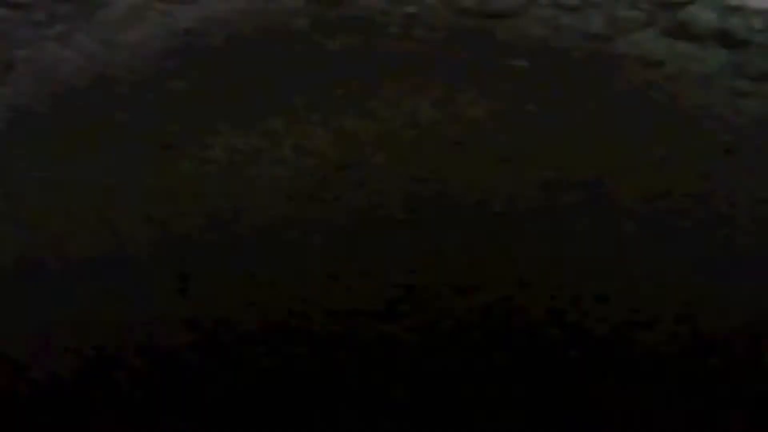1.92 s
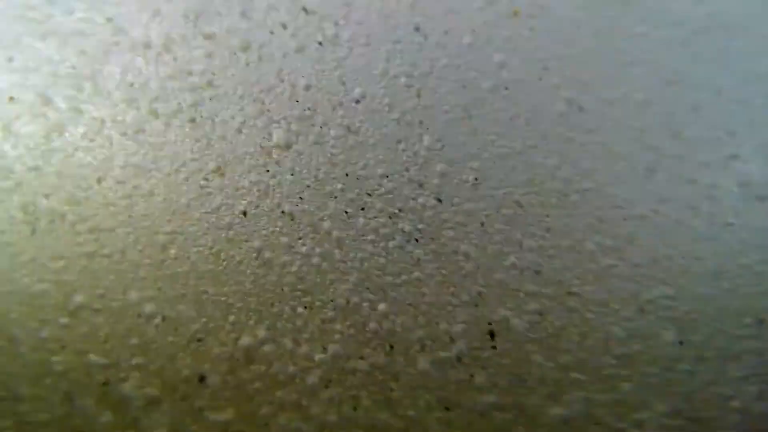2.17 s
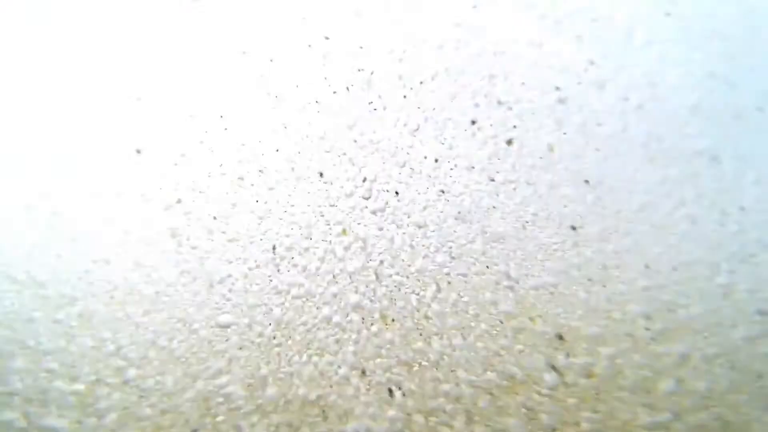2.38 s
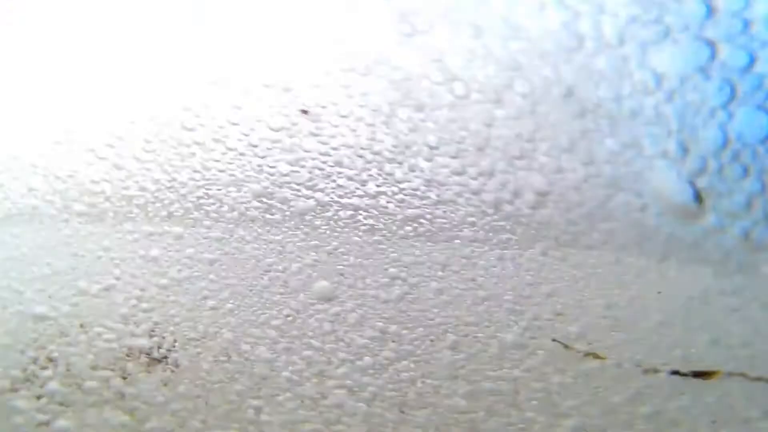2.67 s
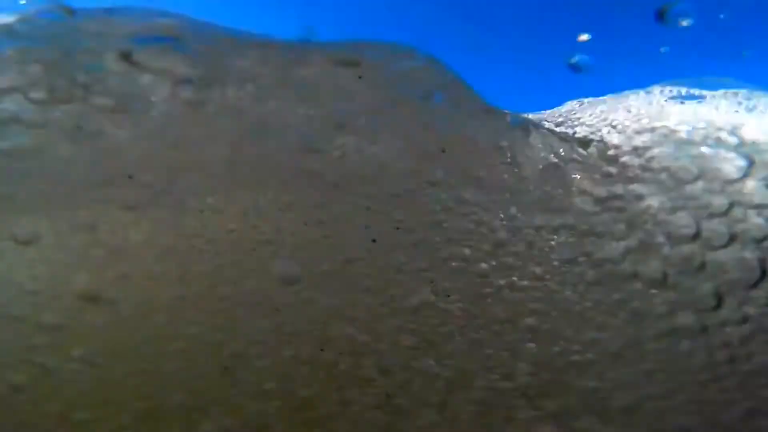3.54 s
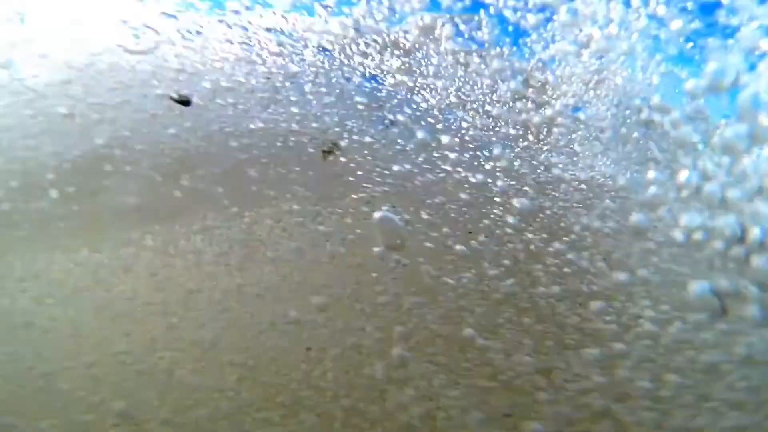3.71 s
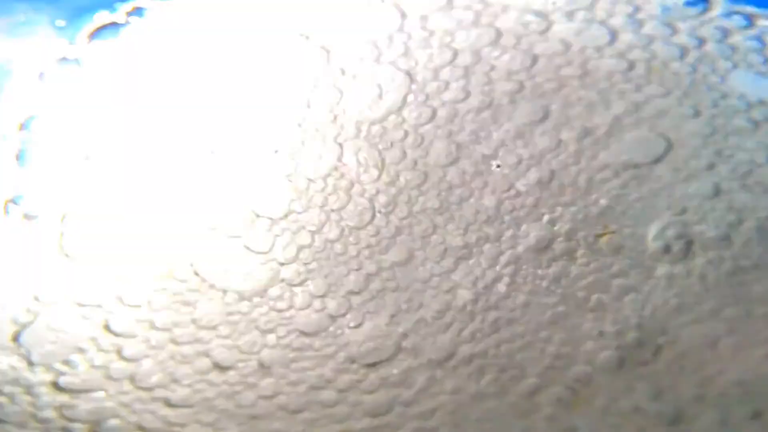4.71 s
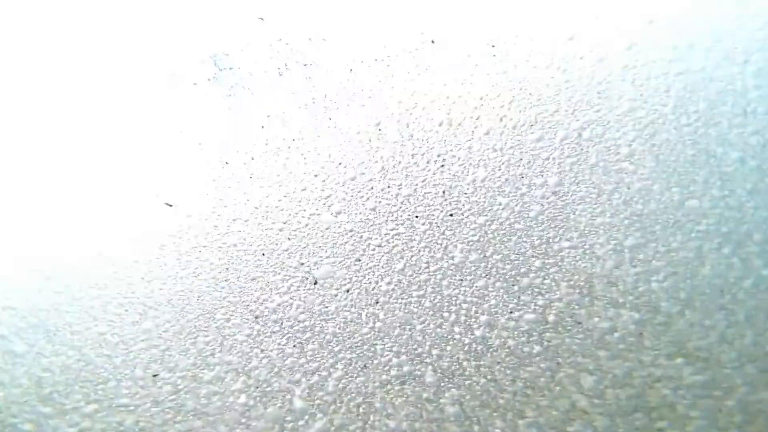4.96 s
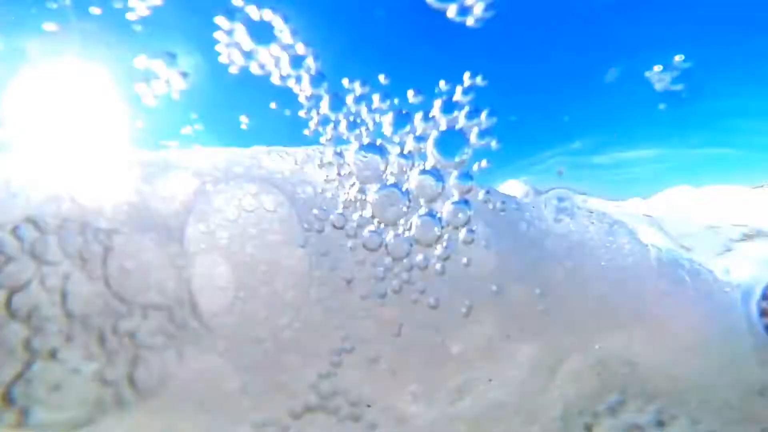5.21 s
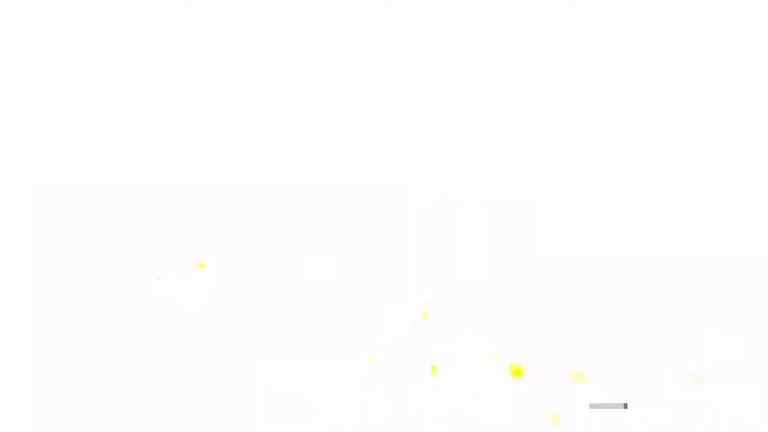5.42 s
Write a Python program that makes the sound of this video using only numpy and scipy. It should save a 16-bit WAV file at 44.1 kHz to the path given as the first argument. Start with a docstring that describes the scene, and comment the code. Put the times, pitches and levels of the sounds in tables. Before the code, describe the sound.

Close, muffled sea foam hisses while bubbles burst sharply on the casing, surging in uneven splashes before cutting off abruptly.

```python
"""A fizzing wash of surf foam, with bubbles bursting against the shell; later spray spatters and a pocket glugs.
The place is the foam itself: two microphones sit in a small camera's sealed housing, water near or further off.
Crowds of damped sines make the bubbles, noise the hiss, rumble and spray, brief rattles the slaps of water.
The shell rings in two ways, pushing both microphones together or in opposition, each with its own colour."""
import sys
import numpy as np
from scipy import signal
from scipy.fft import rfft, irfft, next_fast_len
from scipy.io import wavfile
from scipy.ndimage import map_coordinates

SR = 44100
rng = np.random.default_rng(int(sys.argv[2]) if len(sys.argv) > 2 else 0)


def transcribe(u):
    """Save the signal u as a 16-bit wav file named by the first command-line argument.

    u: samples, shape (n,) or (channels, n), limited to [-1, 1]; the rate is SR.
    q: integer samples, one column per channel.
    """
    v = np.clip(np.atleast_2d(u).T, -1, 1)
    q = np.round(v * 32767).astype(np.int16)
    wavfile.write(sys.argv[1], SR, q)


def volts_from_decibels(level):
    """Turn decibel levels (scalar or array-like) into linear amplitude factors."""
    exponent = np.asarray(level, float) / 20
    return 10 ** exponent


N = 247753  # samples
END_S = 5.497  # the sound stops here


def columns(rows):
    """One value per sample for each column after the time."""
    s, *cols = np.transpose(rows)
    return [np.interp(np.arange(N) / SR, s, col) for col in cols]


def unit(x):
    """x at rms 1, summed over both ways of ringing."""
    return x / np.sqrt(np.sum(np.mean(x ** 2, axis=-1)) + 1e-20)


def wobble(rate):
    """A smooth random curve, rate knots a second (60 at most)."""
    knots = rng.standard_normal(int(N / SR * 60) + 4)
    return map_coordinates(knots, [np.arange(N) * min(rate, 60) / SR])


# the shell's colour when both microphones move together: f/Hz, level/dB
SHELL_TOGETHER = [(15, -33.5), (25, 3), (108, -17.5), (241, -15), (383, -12), (710, -1.5), (1000, -8.5),
                  (1160, -3), (1660, 4), (2400, -9), (3590, -17.5), (4410, -37.5), (5150, -30.5),
                  (6170, -38), (8620, -35), (10500, -47), (11700, -56), (15300, -99)]
# the shell's colour when the microphones move in opposition: f/Hz, level/dB
SHELL_OPPOSED = [(15, -65.5), (25, -22.5), (212, -32.5), (403, -16.5), (828, -6.5), (1280, 10.5),
                 (1940, -11.5), (2850, -7.5), (3590, -19), (4450, -34.5), (5300, -31), (8620, -30.5),
                 (10300, -38.5), (11700, -55.5), (15300, -81.5)]


def shell(x, lo_hz, hi_hz):
    """One range of pitch through the shell's two colours, with nothing ringing ahead of its cause."""
    m = 2 * next_fast_len(N // 2 + 4096)
    hz = np.fft.rfftfreq(m, 1 / SR) + 1
    band = 1 / np.sqrt((1 + (lo_hz / hz) ** 10) * (1 + (hz / hi_hz) ** 10))
    tables = np.transpose(SHELL_TOGETHER), np.transpose(SHELL_OPPOSED)
    colour = volts_from_decibels([np.interp(np.log(hz), np.log(f), db) for f, db in tables])
    # folding the cepstrum onto positive times gives the minimum-phase filter
    cepstrum = irfft(np.log(band * colour + 1e-9), m)
    cepstrum[:, 1:m // 2] *= 2
    cepstrum[:, m // 2 + 1:] = 0
    response = np.exp(rfft(cepstrum))
    return irfft(rfft(x, m) * response, m)[:, :N]


def rings(s, hz, life, size, phase, rise, span):
    """Damped sines with a soft start whose pitch rises as the bubble nears the surface."""
    t = np.arange(span) / SR
    u = t / life[:, None]
    turn = 2 * np.pi * hz[:, None] * t * (1 + rise * np.minimum(u, 4) / 2)
    envelope = (u * np.exp(1 - u)) ** 2
    wave = size[:, None] * envelope * np.sin(turn + phase[:, None])
    start = np.round(np.maximum(s, 0) * SR).astype(int)
    at = start[:, None] + np.arange(span)
    return np.bincount(at.ravel(), wave.ravel(), N + span)[:N]


def froth(near_db, slop, lo_hz, hi_hz, cycles, spread_db, hiss_db, slop_db, lumpy_db, count, size):
    """A crowd of unseen bubbles of uneven strength, over the hiss of water further off."""
    s, pitch, odds, life, *ways = rng.random((count, 8)).T
    hz = lo_hz * (hi_hz / lo_hz) ** pitch
    life_s = cycles * (.5 + life) / hz
    strength = volts_from_decibels(spread_db * np.minimum(-np.log(odds + 1e-9), 2.8))
    # each bubble pushes the two ways with its own strength and phase
    pair = [rings(s * N / SR, hz, life_s, strength * volts_from_decibels(6.6 * share), 2 * np.pi * phase, 0.079, size)
            for share, phase in (ways[:2], ways[2:])]
    # close water: single bubbles stand out of the hiss and the slops cut deeper
    near, far = volts_from_decibels(near_db), volts_from_decibels(hiss_db)
    bubbles = np.array([unit(way) for way in pair])
    water = near * bubbles + far * rng.standard_normal((2, N))
    heard = shell(water / np.hypot(near, far), lo_hz, hi_hz)
    # each slop of water stirs all sizes at once, and each size also clumps by itself
    stir_db = np.sqrt(near) * (slop_db * slop + lumpy_db * wobble(25.063))
    return unit(heard * volts_from_decibels(stir_db))


# the wash, by bubble size: t/s, then small bubbles, large bubbles, air pockets, each level/dB
WASH_LEVELS = [(0, -28, -39.5, -41), (.15, -36, -43.5, -56), (.4, -43.5, -50.5, -61),
               (.56, -43.5, -47.5, -60), (.72, -42.5, -36, -52), (.85, -39.5, -42, -57.5),
               (1.0, -32.5, -31.5, -51.5), (1.3, -37.5, -41, -54.5), (1.6, -46, -51, -59),
               (1.82, -43, -41.5, -52.5), (2.0, -28, -44, -37.5), (2.058, -32.5, -46, -39.5),
               (2.1, -24.5, -32.5, -44.5), (2.165, -35, -48, -43), (2.215, -27.5, -31, -47),
               (2.265, -46.5, -43.5, -53), (2.35, -41.5, -51, -57), (2.7, -41.5, -46.5, -55),
               (2.8, -31.5, -45, -54), (3.05, -39.5, -55, -55.5), (3.3, -38.5, -52, -56.5),
               (3.46, -37.5, -45, -57), (3.54, -29, -36.5, -50), (3.6, -27.5, -36, -40.5),
               (3.675, -37, -42, -51.5), (3.73, -28, -40, -51.5), (3.78, -31.5, -39.5, -48),
               (3.92, -41.5, -53.5, -58), (4.02, -35, -45.5, -51.5), (4.07, -48, -39, -49),
               (4.13, -37, -52, -60.5), (4.2, -30, -43, -54), (4.3, -38.5, -49, -63),
               (4.4, -39.5, -50.5, -65.5), (4.52, -32.5, -41, -53.5), (4.68, -35, -32.5, -54.5),
               (4.82, -29, -35.5, -50.5), (4.95, -26.5, -29.5, -34), (5.04, -31.5, -39.5, -44.5),
               (5.09, -29, -41, -41), (5.17, -33, -33.5, -42), (5.25, -37, -45.5, -50.5),
               (5.45, -39, -49.5, -57.5)]
# how close the churning is to the shell: t/s, level/dB of single bubbles before each size sets its hiss
CHURN_NEARNESS = [(0, -13), (.7, -5), (1.2, -6.5), (1.8, -6), (2.1, -2.5), (2.4, 8), (3, -9.5), (3.3, -7.5),
                  (3.7, -6), (4.2, 3), (4.6, -4), (5, -7.5), (5.5, 0.5)]
# level of the top bands over the small bubbles: t/s, then 2.3-4.2 kHz, above 4.2 kHz, each level/dB
TOP_BANDS = [(0, 2, -9), (.3, -13.5, -10.5), (.55, -6, -13), (1.3, -8, -15), (1.55, -1, -7.5),
             (2.1, -9.5, -18), (2.25, -8, -20.5), (2.36, -8, -11.5), (2.43, -24, -16), (2.63, -21, -17.5),
             (2.7, -11, -19.5), (2.85, -11.5, -20.5), (3.2, -3.5, -11), (3.6, -7, -15), (4.3, -9.5, -14.5),
             (4.7, -7, -17), (5.1, -13.5, -19), (5.45, -5, -12)]


def wash():
    """Five bands of bubbles and hiss, low air pockets to treble fizz; the top three swell together."""
    small_db, large_db, pockets_db = columns(WASH_LEVELS)
    near = columns(CHURN_NEARNESS)[0]
    small, large, pockets = volts_from_decibels(small_db), volts_from_decibels(large_db), volts_from_decibels(pockets_db)
    upper, top = small * volts_from_decibels(columns(TOP_BANDS))
    slop = wobble(18)
    mix = pockets * froth(near, slop, 98.6, 395, cycles=0.79, spread_db=-1.5, hiss_db=11.0,
                          slop_db=1.0, lumpy_db=2.5, count=500, size=2048)
    mix += large * froth(near, slop, 388.5, 1066, cycles=1.0, spread_db=6.5, hiss_db=10.0,
                         slop_db=1.5, lumpy_db=-3.5, count=1400, size=1024)
    mix += small * froth(near, slop, 1006, 2530, cycles=2.45, spread_db=4.5, hiss_db=6.5,
                         slop_db=2.0, lumpy_db=4.0, count=3500, size=512)
    mix += upper * froth(near, slop, 2317, 4190, cycles=3.07, spread_db=4.5, hiss_db=0.0,
                         slop_db=4.5, lumpy_db=0.75, count=3500, size=256)
    mix += top * froth(near, slop, 4200, 15000, cycles=3.3, spread_db=8.5, hiss_db=0.0,
                       slop_db=4.0, lumpy_db=0.5, count=9000, size=128)
    return mix


def rumble():
    """The low push of moving water, mostly alike at both microphones, swelling a little with the air pockets."""
    pockets_db = columns(WASH_LEVELS)[2]
    follow_db = .3 * (pockets_db - pockets_db.mean())
    swell = volts_from_decibels(-58.5 + follow_db + 0.54 * wobble(1.1) + 0.98 * wobble(8.3))
    push = shell(rng.standard_normal((2, N)), 39, 97)
    return swell * unit(push * volts_from_decibels([[0], [-9]]))


# small slaps: level/dB over the small bubbles and half the nearness, spread of sizes/dB, decay/ms
PATTER_DB, PATTER_SPREAD_DB, PATTER_MS = -1, 7.5, 1.1


def patter(count):
    """Small slaps of water on the shell: each a brief rattle that rings all its resonances at the same moment."""
    when, big = rng.random((count, 2)).T
    pushes = np.zeros(N)
    pushes[(when * N).astype(int)] = volts_from_decibels(PATTER_SPREAD_DB * np.minimum(-np.log(big + 1e-9), 2))
    decay = signal.lfilter([1], [1, -np.exp(-1000 / PATTER_MS / SR)], pushes)
    rattle = decay * rng.standard_normal((2, N))
    level_db = columns(WASH_LEVELS)[0] + columns(CHURN_NEARNESS)[0] / 2 + PATTER_DB
    return volts_from_decibels(level_db) * unit(shell(rattle, 250, 3300))


# lesser bursts come by chance: lowest and highest f/Hz
STRAY_LO_HZ, STRAY_HI_HZ = 1000, 3800
# level/dB over small bubbles plus nearness, before the shell's colour; scatter/dB either way; mean cycles
STRAY_DB, STRAY_SCATTER_DB, STRAY_CYCLES = 3, 4, 5


def strays(count):
    """Rows of lesser bursts, louder where the wash is strong and near, coloured by the shell."""
    when, pitch, length, *scatter = rng.random((count, 5)).T
    s = when * END_S
    hz = STRAY_LO_HZ * (STRAY_HI_HZ / STRAY_LO_HZ) ** pitch
    wash_db = columns(WASH_LEVELS)[0] + columns(CHURN_NEARNESS)[0]
    db = wash_db[(s * SR).astype(int)] + STRAY_DB
    ways = [db + np.interp(hz, *np.transpose(colour)) + STRAY_SCATTER_DB * (2 * chance - 1)
            for colour, chance in zip((SHELL_TOGETHER, SHELL_OPPOSED), scatter)]
    ms = STRAY_CYCLES * (.5 + length) * 1000 / hz
    return np.transpose([s, hz, *ways, ms])


# the loudest bubbles bursting on the shell: t/s, f/Hz (together), together level/dB, opposed level/dB, length/ms
SHELL_BURSTS = [(0.027, 1820, -35, -32, 3.7), (0.039, 1770, -29, -32, 4.2), (0.094, 2620, -25, -24, 2.3),
                (0.941, 5120, -32.5, -49, 4.1), (0.951, 1480, -22.5, -31, 2.8),
                (0.982, 1070, -38, -20, 7.1), (1.035, 8600, -40, -33.5, 1.2), (1.077, 695, -29, -24, 2.6),
                (1.137, 1110, -25, -14, 4.4), (1.14, 1380, -25.5, -36, 5.3), (1.17, 1300, -25, -27, 1.9),
                (1.189, 617, -26.5, -40, 8.8), (1.201, 1210, -30, -25, 5.3), (1.231, 1430, -25, -28, 4.1),
                (1.242, 1490, -23, -23, 4), (1.294, 1550, -29, -44, 8.3), (1.307, 634, -26, -29, 4.5),
                (1.363, 646, -28, -33, 6.7), (1.897, 1390, -24, -22, 2.5), (1.943, 306, -31, -57, 7.7),
                (1.956, 1400, -24, -18, 2.2), (2.012, 714, -25, -19.5, 7.9), (2.012, 1250, -20, -11.5, 3.4),
                (2.017, 210, -23, -23, 5), (2.018, 484, -11, -18.5, 3.6), (2.018, 6850, -28, -37.5, 0.99),
                (2.019, 1340, -12, -4.5, 2.2), (2.02, 2500, -21.5, -32, 2.4), (2.02, 5050, -33, -33.5, 2.6),
                (2.022, 8000, -31, -22.5, 1.5), (2.024, 516, -24, -22.5, 5.2), (2.033, 1410, -17, -16, 7.4),
                (2.033, 1920, -28, -40, 8.6), (2.067, 1280, -22.5, -10.5, 4.9),
                (2.068, 8100, -33, -30.5, 0.97), (2.092, 524, -30.5, -33, 13), (2.094, 1750, -24, -27, 8.1),
                (2.094, 6960, -37, -40, 1.9), (2.104, 1140, -28, -12, 2.1), (2.12, 1290, -21, -15, 2.1),
                (2.209, 620, -34, -40, 6.6), (2.209, 1700, -12, -35, 1.4), (2.235, 1860, -20, -24, 2.3),
                (2.241, 1650, -14, -24.5, 1.4), (2.282, 1600, -22, -34, 4.7),
                (2.284, 1057, -21.5, -18, 8.8), (2.296, 1270, -29, -12.5, 3.8),
                (2.327, 1580, -28, -21, 5.4), (2.337, 322, -33.5, -38, 8.1), (2.367, 1900, -34, -34, 1.3),
                (2.4, 2790, -15.5, -13.5, 2.35), (2.449, 1740, -28, -40, 4.6), (2.482, 1200, -27, -37, 7.4),
                (2.5, 815, -32, -36, 6.3), (2.594, 780, -24, -36, 2), (2.647, 1075, -26, -23, 6),
                (2.718, 2260, -27, -25, 3.7), (2.736, 1080, -35, -14, 3.6), (2.736, 1480, -21.5, -34, 4.1),
                (2.777, 2780, -27.5, -30, 3.3), (2.799, 1700, -25, -26, 2.4), (2.846, 1636, -22, -33, 7),
                (2.882, 1940, -20, -29, 0.9), (2.885, 1180, -15, -10, 3.9), (2.885, 1860, -18.5, -31, 0.33),
                (2.891, 970, -22.5, -13.5, 2.6), (2.894, 2130, -20, -24, 1.2),
                (2.948, 3630, -28.5, -40, 2.6), (2.966, 1580, -17.5, -19, 4),
                (3.071, 2900, -21, -19.5, 0.99), (3.072, 1700, -28.5, -35, 5.4),
                (3.154, 1720, -24, -24, 3.1), (3.363, 716, -29, -39, 11), (3.415, 770, -33, -36, 7),
                (3.476, 2970, -25, -28, 2.4), (3.498, 654, -24.5, -28, 3.3), (3.537, 334, -26.5, -32, 4),
                (3.538, 830, -26.5, -28, 6), (3.538, 1400, -29, -23, 9.7), (3.548, 2500, -20, -31, 2.1),
                (3.549, 1310, -18.5, -25, 1.5), (3.556, 1870, -30, -18, 3.1),
                (3.596, 1600, -29, -14.5, 1.9), (3.607, 630, -24, -25, 5.4), (3.609, 181, -35, -31, 8.4),
                (3.611, 1560, -17, -23, 0.75), (3.626, 1750, -21, -32, 4.4), (3.627, 517, -22, -21.5, 3.4),
                (3.629, 2550, -24, -26, 2.65), (3.63, 1580, -28, -11, 0.69), (3.702, 1800, -24, -36, 4.1),
                (3.717, 7300, -27, -22.5, 1), (3.727, 607, -30.5, -35, 8.5), (3.775, 1810, -11.5, -12, 3.1),
                (3.776, 3480, -34, -19, 0.28), (3.778, 1560, -13.5, -12, 2.7),
                (3.783, 1950, -12.5, -18, 1.8), (3.874, 2580, -24, -24, 4.8),
                (4.001, 1890, -20.5, -41, 2.5), (4.006, 2180, -25, -24, 2.3), (4.029, 2900, -26, -25, 1.8),
                (4.034, 360, -31, -43, 5.2), (4.046, 2670, -22.5, -22.5, 4.4),
                (4.052, 710, -23, -15.5, 2.2), (4.052, 1418, -10.5, -4.5, 2.38),
                (4.052, 2095, -29, -20.5, 2.3), (4.055, 1520, -14.5, -28, 2.3),
                (4.085, 630, -31.5, -22, 5.7), (4.085, 1270, -21.5, -16, 6.4), (4.097, 2600, -27, -32, 3.5),
                (4.099, 1690, -14.5, -15, 2.3), (4.163, 513, -34.5, -37, 12.3),
                (4.165, 1740, -41, -23, 4.4), (4.182, 1260, -26, -15.5, 6), (4.183, 1670, -20, -28, 6.9),
                (4.245, 1470, -21, -31, 3), (4.249, 2072, -17.5, -15, 0.82), (4.255, 1460, -17, -16, 2.8),
                (4.255, 2480, -25, -23, 2.5), (4.283, 594, -33.5, -43, 6.6), (4.295, 3030, -27, -17, 1.5),
                (4.312, 1370, -18.5, -28, 3.3), (4.312, 3420, -24.5, -21.5, 2.5),
                (4.336, 2340, -24.5, -23, 3), (4.572, 1380, -21, -16.5, 2.9), (4.754, 1900, -20, -16, 2.1),
                (4.758, 1540, -21.5, -20, 2.3), (4.759, 3220, -24, -31.5, 1.3),
                (4.77, 2100, -16.5, -28, 2.5), (4.772, 786, -23, -26, 2.4), (4.781, 1800, -17, -15, 2.1),
                (4.794, 200, -27.5, -50, 5.1), (4.81, 2580, -19, -20, 1.5), (4.81, 3440, -26, -32, 2.8),
                (4.814, 2240, -27, -33, 3.3), (4.868, 190, -34, -50, 7.4), (4.871, 480, -25.5, -26, 3.8),
                (4.906, 2640, -21, -19, 3.7), (4.914, 1144, -24.5, -17, 12), (4.927, 660, -25.5, -27, 11.6),
                (4.927, 1185, -21.5, -17.5, 8.5), (4.928, 1700, -19, -29, 2.4),
                (4.93, 263, -15, -31.5, 10.5), (4.931, 452, -25, -30, 12.6), (4.932, 1400, -30, -20, 3.5),
                (4.947, 1530, -11, -31, 1.8), (5.021, 2360, -24.5, -32, 2.1),
                (5.022, 1560, -14.5, -21, 2.9), (5.057, 176, -19.5, -42, 6.9),
                (5.061, 374, -19.5, -43, 3.5), (5.082, 9150, -35, -35, 1.6), (5.126, 210, -28, -58, 10),
                (5.138, 636, -26.5, -36, 4.9), (5.164, 1270, -29, -16, 3.3), (5.212, 1640, -25, -35, 3.4),
                (5.313, 1730, -26.5, -34, 7.3), (5.369, 111, -33, -59, 5.2), (5.378, 1760, -23, -38, 1.1),
                (5.379, 2680, -24.5, -23, 1.56), (5.386, 1830, -17.5, -24, 1.9),
                (5.488, 708, -27.5, -29, 3.5)]
# in opposition the shell's strongest resonance draws lower bubbles towards it
# and takes over those a little higher: f/Hz, share 0-1, up to f/Hz
DRAW_HZ, DRAW, DRAW_TOP_HZ = 1302, 0.35, 2066


def bursts():
    """Each near bubble snaps as its skin breaks and rings the shell both ways at once."""
    s, hz_with, db_with, db_against, ms = np.vstack([SHELL_BURSTS, strays(count=260)]).T
    drawn = np.minimum(hz_with * (DRAW_HZ / hz_with) ** DRAW, DRAW_HZ)
    hz_against = np.where(hz_with < DRAW_TOP_HZ, drawn, hz_with)
    phase = 2 * np.pi * rng.random((len(s), 2))
    life = ms / 1000 / 2.58
    start = s - life / 3
    together = rings(start, hz_with, life, volts_from_decibels(db_with), phase[:, 0], 0.014, span=2560)
    opposed = rings(start, hz_against, life, volts_from_decibels(db_against), phase[:, 1], .015, span=2560)
    # opposed ringing has little bass
    opposed = signal.lfilter(*signal.butter(2, 160, 'high', fs=SR), opposed)
    # short bursts snap hardest
    snaps = np.zeros((2, N))
    snap_size = volts_from_decibels(np.maximum(db_with, db_against) + 23.5) / ms
    snaps[:, np.round(s * SR).astype(int)] = snap_size * np.cos(phase.T)
    return np.array([together, opposed]) + shell(snaps, 1450, 3500)


# spray spattering the shell: t/s, level/dB before SPRAY_DB is added
SPRAY_HITS = [(1.034, -25.5), (1.9066, -37.5), (2.89, -38), (3.1689, -31.5), (3.718, -40.5),
              (3.7968, -38.5), (4.1957, -25.5), (4.427, -33), (5.1197, -32.5)]
SPRAY_MS, SPRAY_DB = 1.7, -1.5  # decay of a spatter, offset to the table's levels


def spray():
    """Short bright spatters of droplets: spiky noise through the shell, starting sharply and dying fast."""
    t, swell = np.arange(N) / SR, 0
    for s, db in SPRAY_HITS:
        decay = np.exp(-np.abs(t - s) * 1000 / SPRAY_MS)
        swell = swell + (t > s) * volts_from_decibels(db + SPRAY_DB) * decay
    drops = rng.standard_normal((2, N)) ** 3  # cubing makes the noise spiky
    return swell * unit(shell(drops, 7200, 12000))


# a large trapped pocket of air glugs after a blow, its pitch rising as it escapes:
# t/s, f/Hz and level/dB, both about which the tone wavers
POCKET_GLUG = [(5.05, 170.4, -59), (5.075, 204.3, -37), (5.14, 215, -37), (5.17, 234, -39.5),
               (5.2, 302, -45.5)]


def glug():
    """An unsteady low sine, rising in pitch, that pushes both microphones almost wholly together."""
    hz, db = columns(POCKET_GLUG)
    tone = np.sin(2 * np.pi * np.cumsum(hz * (1 + .16 * wobble(55))) / SR)
    first, last = POCKET_GLUG[0][0], POCKET_GLUG[-1][0]
    inside = np.abs(np.arange(N) / SR - (first + last) / 2) < (last - first) / 2
    return inside * volts_from_decibels(db + 5 * wobble(45)) * tone * volts_from_decibels([[0], [-26]])


def scene():
    """The left microphone hears together plus opposed, the right together minus opposed."""
    together, opposed = wash() + rumble() + patter(count=1000) + bursts() + spray() + glug()
    return np.array([together + opposed, together - opposed])


def top_cut(x):
    """Nothing passes above the cut-off."""
    return signal.sosfilt(signal.butter(12, 11890, fs=SR, output="sos"), x)


def record(dry):
    """The sound ends abruptly, closing over 2.3 ms."""
    gate = np.clip((END_S - np.arange(N) / SR) / 0.0023, 0, 1)
    return top_cut(dry * gate)


dry = scene()
out = record(dry)
transcribe(out)
```